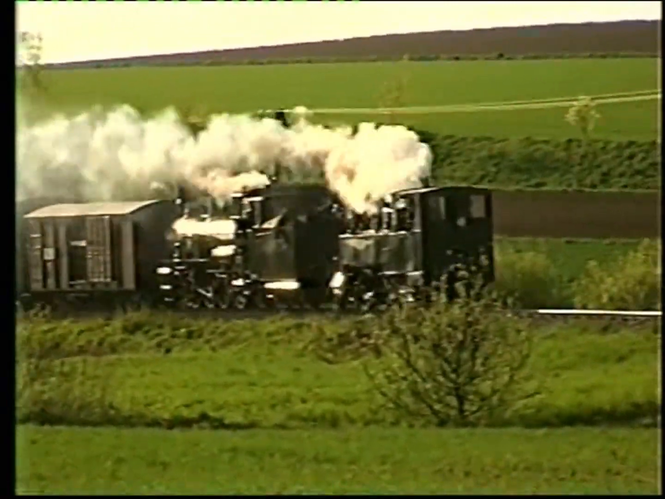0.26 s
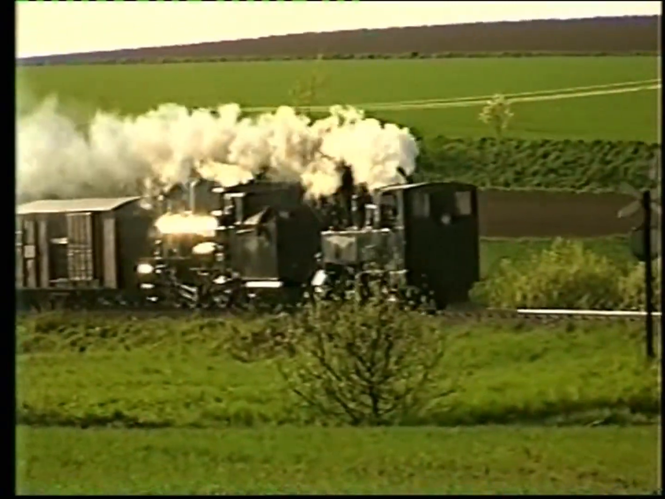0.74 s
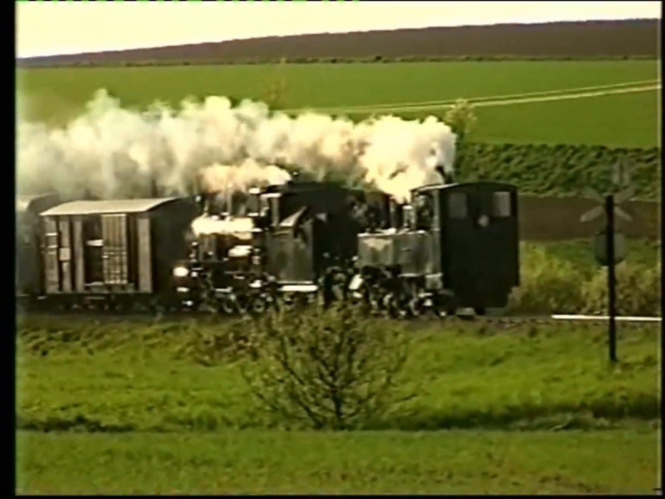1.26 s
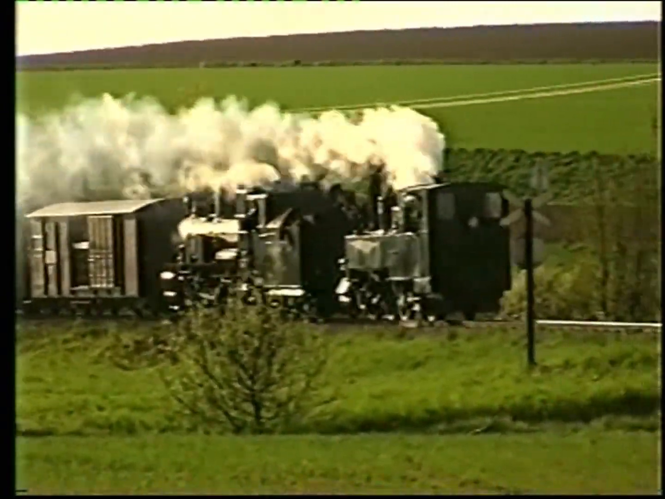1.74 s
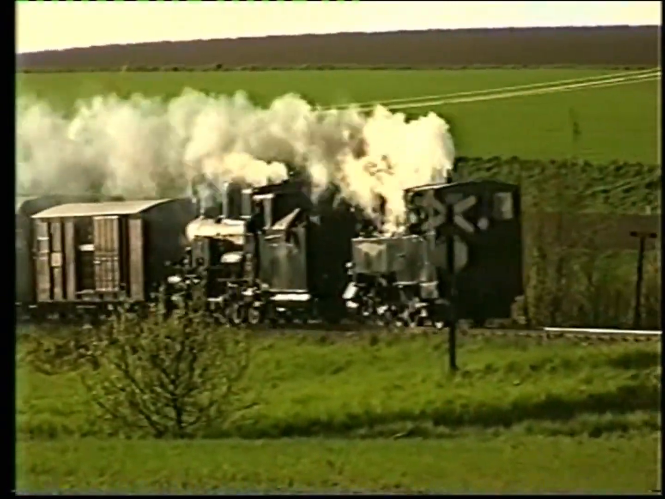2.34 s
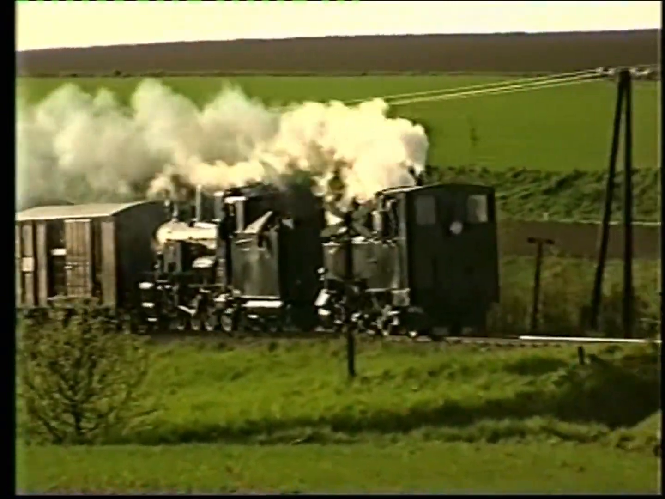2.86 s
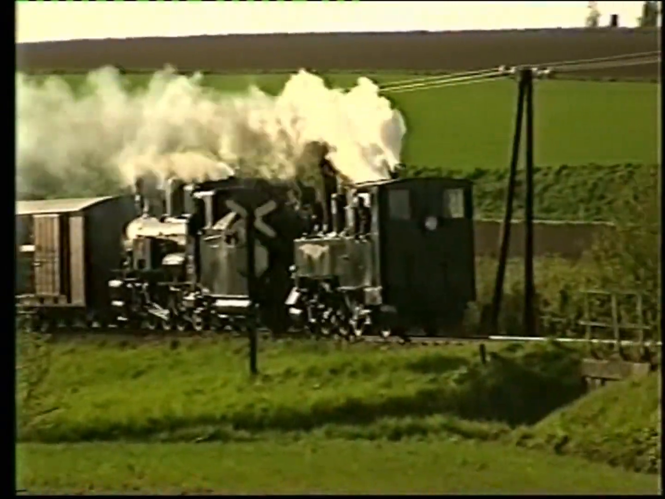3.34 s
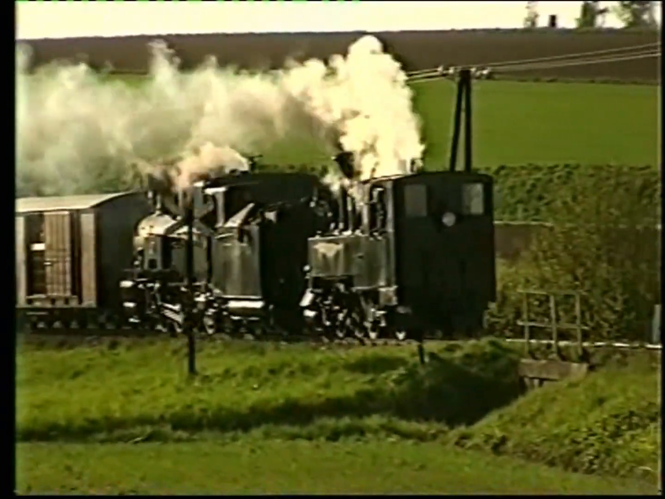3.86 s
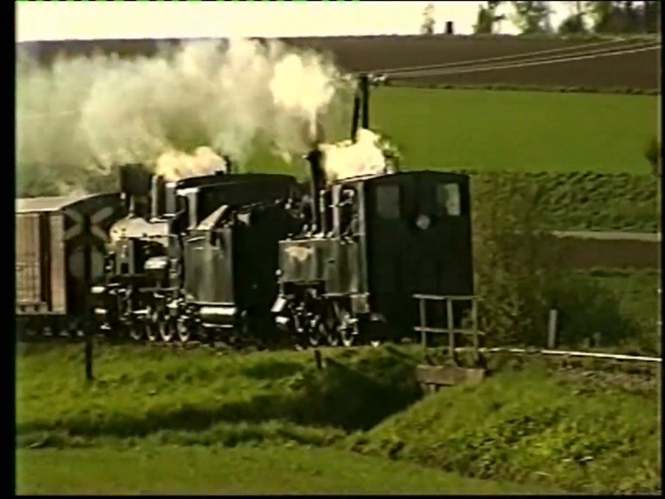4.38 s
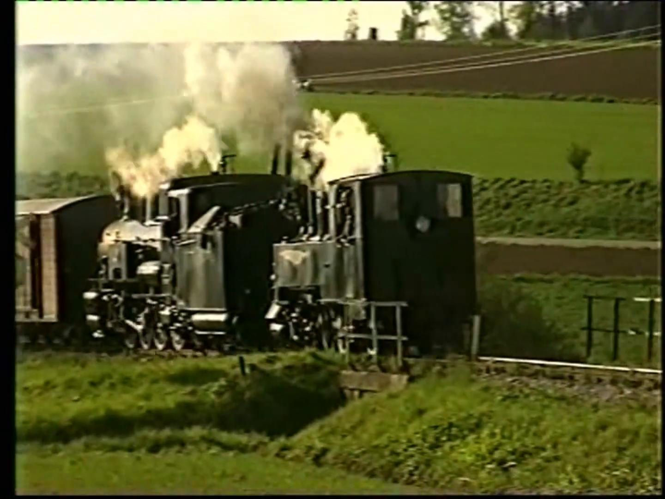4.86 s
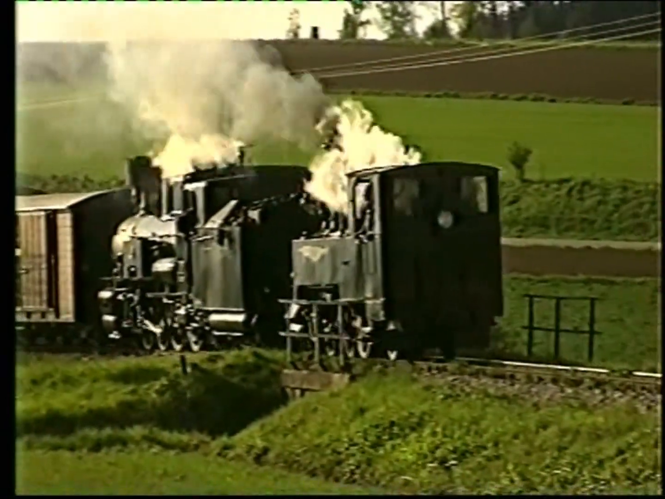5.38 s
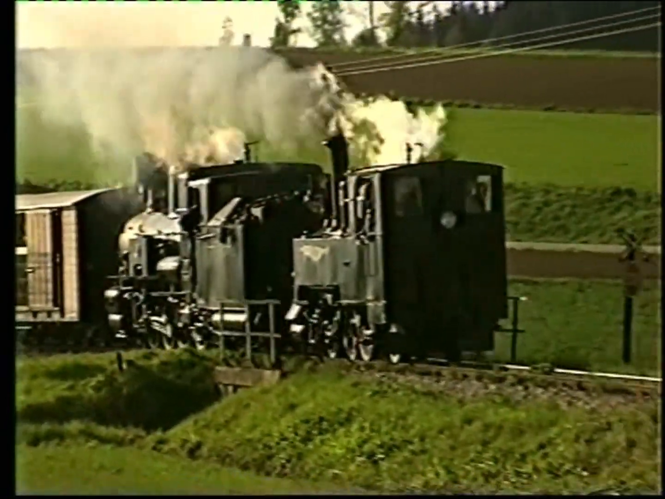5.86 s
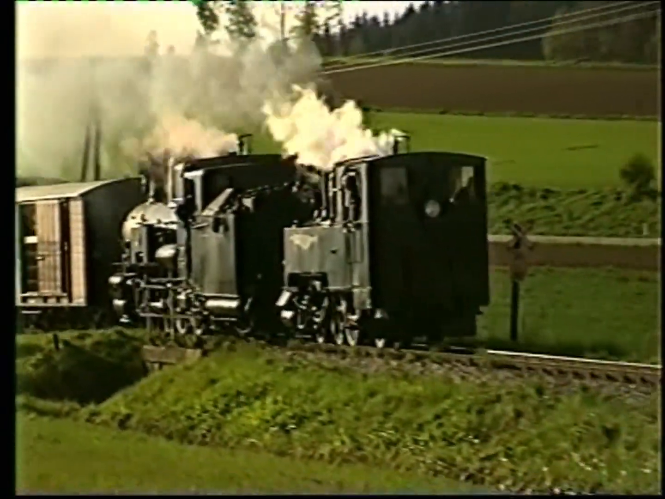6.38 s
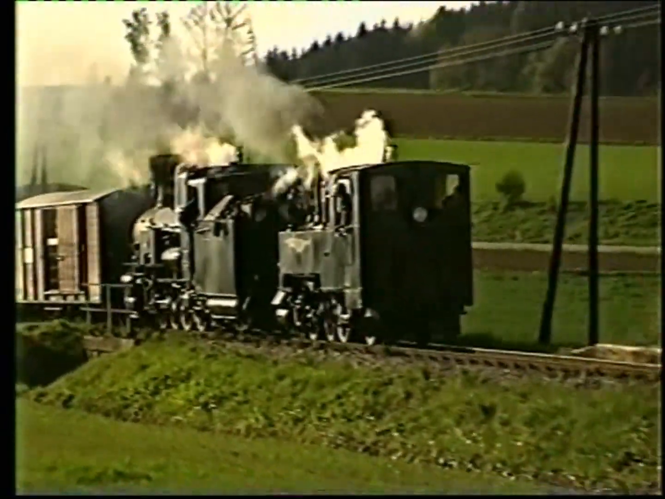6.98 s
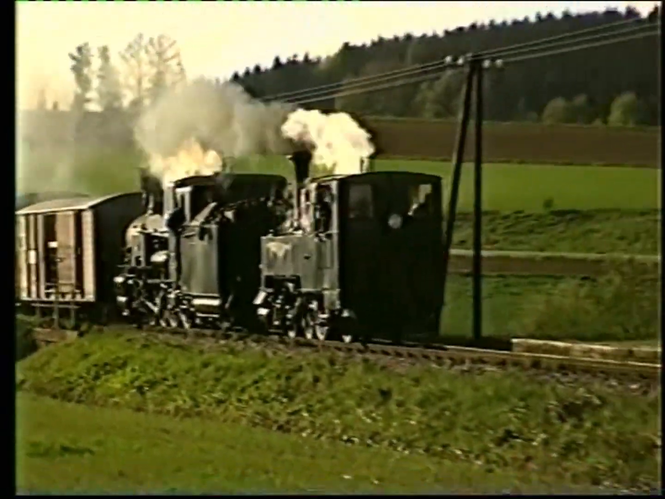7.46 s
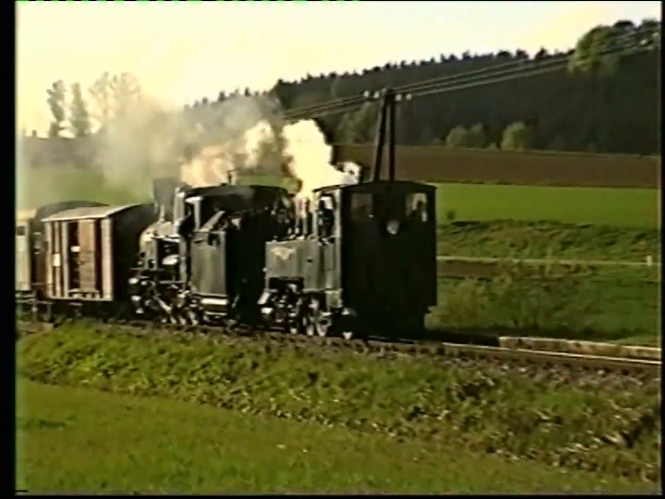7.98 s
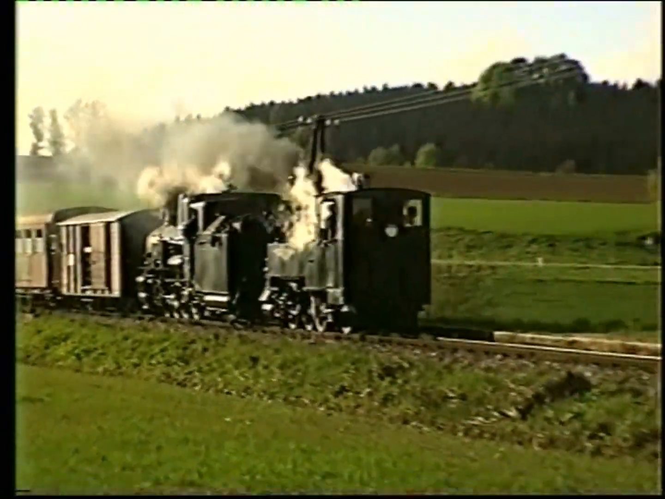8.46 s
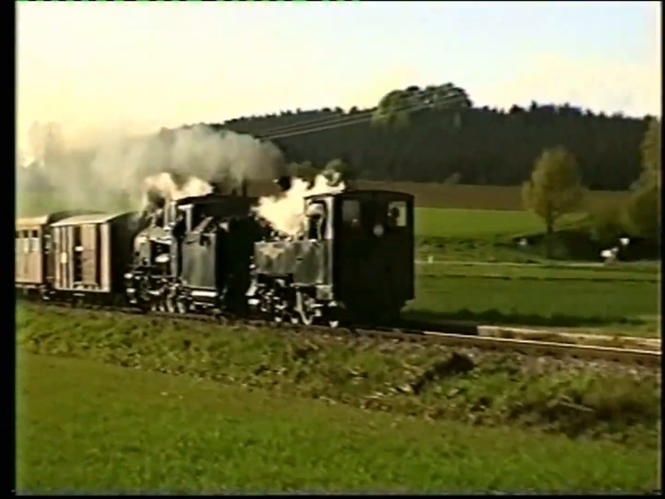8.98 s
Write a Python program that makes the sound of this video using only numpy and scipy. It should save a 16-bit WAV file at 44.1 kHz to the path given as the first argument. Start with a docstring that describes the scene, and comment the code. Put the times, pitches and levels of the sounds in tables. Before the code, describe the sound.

From 0 s a steam whistle is already blowing across open fields: a strong, nearly pure tone near 850 Hz, with shimmering overtones and breathy steam hiss. It rises slightly around 1 s, drops a little just before 2 s, spits a few tiny watery ticks around 2.6 to 2.8 s, then climbs back by 3 s, faintly beating. It cuts off at about 4.05 s; a short toot of roughly 0.14 s follows at 4.2 s, and soft, slightly lower echoes trail away. From 4.5 s the train emerges and swells to the end near 9 s: rapid, uneven exhaust chuffs, around fourteen a second from two engines, bright steam spurts, irregular metal clanks, hollow low thumps, leaking steam and rumbling, ringing wheels. The sound is mid-heavy and dulled by distance, almost entirely on the right, with faint hiss, low hum and a very high thin whine.

```python
"""Open fields ringed by hills: two small steam locomotives haul a train; a long whistle, then a short blast.
The whistle is a nearly pure pipe tone with fluttering overtones and jet hiss; echoes of the tone trail off.
Exhaust beats, rod clanks and rolling wheels swell up after it: noise bursts through resonances, shaped noise
and low thumps. The scene plays on the right; the left carries only leakage, hiss and hum."""
import sys
import numpy as np
from scipy import signal
from scipy.fft import rfft, irfft, next_fast_len
from scipy.io import wavfile
from scipy.ndimage import uniform_filter1d

SR = 44100
rng = np.random.default_rng(int(sys.argv[2]) if len(sys.argv) > 2 else 0)


def pcm_store(signal):
    """Save signal as 16-bit PCM."""
    levels = np.round(np.clip(np.atleast_2d(signal), -1, 1) * 32767)
    wavfile.write(sys.argv[1], SR, levels.astype(np.int16).T)


N = 407043   # length in samples

# Levels are balances inside the scene, ahead of the trims in the functions and the final doubling.
# In noise colours, shape_db is only relative: the noise is scaled to rms 1.

# Whistle valve: open_s, shut_s (where the fall begins)
VALVE_TIMES = [(-1.0, 4.057), (4.226, 4.363)]
# Driver's hand on the whistle: time_s, pitch_hz (at full pressure), tone_db, overtones_db, hiss_db
WHISTLE_HAND = [(0.0, 854, -23.5, -45, -53), (0.28, 851, -23, -46.5, -59), (0.36, 849, -25, -48.5, -55.5),
                (0.46, 848, -22, -50, -57.5), (0.6, 849, -23.3, -50, -56), (0.67, 857, -25, -50, -55.5),
                (0.73, 868.4, -23.5, -47.5, -56), (0.88, 878, -24, -45.5, -59.5),
                (1.15, 878, -23.5, -45, -59.5), (1.27, 869, -25.5, -45.5, -61),
                (1.36, 872, -25, -42, -54.5), (1.49, 871, -23.5, -42.5, -48),
                (1.62, 879.4, -24.5, -40, -54), (1.76, 880.4, -24, -43, -60), (1.86, 873, -24, -42, -59.5),
                (1.95, 829.7, -26.5, -49, -62.5), (2.23, 833.6, -24.5, -46, -56.5),
                (2.45, 822.5, -23.5, -53, -57), (2.55, 820, -23.5, -55.5, -66), (2.62, 824, -26, -58, -63),
                (2.81, 829, -22.5, -50, -59), (2.93, 849, -23, -46.5, -53.5), (3.08, 850, -23, -44, -51.5),
                (3.22, 853, -25, -45, -58), (3.43, 862, -25, -39, -51.5), (3.6, 844, -24, -45, -52),
                (3.83, 842.6, -23.5, -45, -55), (3.93, 842, -24.5, -43, -55), (4.01, 852, -22, -46, -51),
                (4.06, 838, -23, -48, -61), (4.25, 837.4, -24, -43, -51), (4.29, 845, -22, -48, -50.5),
                (4.35, 858, -23.5, -41, -53), (4.37, 843, -24, -42, -56)]
# Whistle overtones: multiple of the pitch, level_db, share of the overtones' swing followed, flutter_db
OVERTONES = [(2, -6, .2, 3.5), (3, -8.5, 0.73, 2.5), (4, -0.7, 1, 1.24), (5, -14.5, 0.82, 2),
             (6, -13, 1.05, 2.3), (8, -31.5, .95, 2.5)]
# Tone colour: time_s, then lift_db of the 2nd, 3rd, 5th, 6th and 8th partial
TONE_COLOUR = [(0, 4.5, -6, 7.5, -4, -1), (.26, -7.5, -1, 4, 1.5, 5), (.4, 4, -4.5, 5.5, 2.5, -2),
               (.7, -2.5, 0.5, 4.5, -4.5, 2), (1.0, 3, -1, 6, -10, 0.5), (1.2, 2, 3, 6, -7.5, 3.5),
               (1.45, -1, 0.5, 5, -1, 12), (1.65, -2, 3.5, 0, -7, 1), (1.88, -3.5, -1.5, -10, 2, 3.5),
               (2.15, -1, -3.5, -4, 2.5, -0.5), (2.4, 1.5, -5, -6, 3, 0), (2.7, -3, 4, -7, 4.5, 1),
               (3.0, -1.5, -0.5, -4.5, 3.5, 3), (3.4, -3, -5.5, 2.5, 0, 2.5), (3.7, -0.5, -0.5, -2, 1.5, 0),
               (4.3, 2, -4, -2, 1, 0)]
# Fainter tone sliding away under the whistle and beating with it:
# time_s, below_hz, level_db (against the tone), octave_db (on the overtones' scale)
SLIDING_TONE = [(3.09, 5.9, -29, -76), (3.21, 8.3, -13, -66), (3.41, 18, -13.5, -65), (3.53, 22, -20, -59),
                (3.6, 31, -16.5, -52), (3.68, 32, -15, -49.5), (3.76, 33, -20, -59), (3.95, 39, -27, -58),
                (4.06, 40, -26, -55)]
# Colour of the whistle's steam jet: freq_hz, shape_db (per Hz)
JET_COLOUR = [(600, -21), (1000, 8), (1700, -1.5), (2300, -10), (3500, -1.5), (4300, -3), (5100, -5),
              (6000, -8), (7200, -11.5), (10000, -21.5), (14000, -45)]
# Lift of the jet's highest treble: time_s, lift_db
JET_TREBLE = [(0, -1), (.2, -1.5), (.55, 5.5), (.8, -1), (1.2, -1), (1.5, 1), (1.8, 0), (2.2, 1),
              (2.5, -1.5), (3.0, 2), (3.5, -0.5), (4.3, 1.5)]
# Sound bounced off the field, cutting notches in the hiss: time_s, lag_ms, share of the direct sound
FIELD_BOUNCE = [(0, .445, .25), (.6, .44, 0.33), (1.3, .445, 0.33), (1.66, .46, .25), (2.0, .535, .55),
                (2.5, .535, .55), (3.0, .535, .55), (3.6, .53, .4), (4.4, .53, 0.37)]
# Clearest single echoes: first_lag_s, level_db, pitch drop as a share
CLEAR_ECHOES = [(.13, -25.5, .004), (.213, -25, 0.019), (0.435, -21, .032), (.56, -27.5, .03),
                (.686, -28, 0.033)]
# The train as a whole: time_s, rolling_db, leak_db (against rolling)
TRAIN_LEVELS = [(0.0, -54.5, 3.5), (0.46, -54.5, 2), (1.67, -58.5, 0), (2.6, -50, 1), (3.24, -56, 0.5),
                (4.6, -51.5, -1), (4.95, -46.5, -2.5), (5.4, -43.5, -6), (5.85, -42.5, -4.5),
                (6.4, -42, -2), (7.1, -40.5, -4.5), (7.45, -40.5, -0.5), (7.9, -39, -5),
                (8.12, -38.5, -4.5), (8.26, -39, -6), (8.4, -38.5, -3.5), (9.05, -37, -3.5),
                (9.23, -36, -8)]
# Colour of the rolling rumble: freq_hz, shape_db (per Hz)
ROLLING_COLOUR = [(24, -61), (40, -23.5), (130, -0.5), (173, -2), (227, -8.5), (269, -11.5), (310, -9),
                  (380, -12), (460, -4.5), (571, -0.5), (793, -7.5), (961, -1), (1230, -16), (1440, -7),
                  (1920, -11.5), (4000, -26), (5200, -37.5), (8800, -120)]
# Ringing wheels and frames: freq_hz, width_hz, level_db (against rolling), throb_db
WHEEL_RINGS = [(129, 39, -16, 0.5), (271, 22, -13.5, 3), (568.5, 24, -11, 3.5), (999, 130, -6.5, 2.5)]
# Colour of the steam leak: freq_hz, shape_db (per Hz)
LEAK_COLOUR = [(700, -30.5), (1200, -21), (1460, 1), (2300, 0.5), (3000, -1.7), (3700, -5), (4200, -9.5),
               (5900, -14), (8500, -28.5), (12000, -42.5), (16000, -74.5)]
# Clearest cylinder spurts: top_s, peak_db
CLEAR_SPURTS = [(4.547, -63), (4.679, -60), (4.829, -63), (4.96, -63), (5.107, -62), (5.23, -58),
                (5.39, -54), (5.51, -61), (5.677, -59), (5.81, -58), (5.96, -54), (6.09, -52), (6.229, -55),
                (6.364, -49), (6.519, -53), (6.655, -55), (6.794, -54), (6.936, -54), (7.083, -48),
                (7.21, -48), (7.36, -54), (7.495, -53), (7.659, -52), (7.781, -53), (7.931, -50),
                (8.06, -50), (8.21, -46), (8.345, -45), (8.474, -45.5), (8.617, -49), (8.765, -50),
                (8.909, -49), (9.054, -48), (9.185, -49)]
# Colour of a spurt: freq_hz, shape_db (per Hz)
SPURT_COLOUR = [(2000, -14), (3500, -3), (5000, 0), (6500, -2), (8000, -8.5), (10000, -14), (12000, -23),
                (14000, -40)]
# Heaviest exhaust beats: start_s, peak_db, length_s
HEAVY_CHUFFS = [(4.547, -46, 0.03), (4.821, -40, 0.041), (5.024, -36, 0.03), (5.308, -29.5, 0.027),
                (5.512, -33, 0.028), (5.585, -29, 0.033), (6.075, -30.5, 0.11), (6.177, -32, 0.024),
                (6.43, -34, 0.05), (6.586, -33, 0.028), (6.715, -29.5, 0.036), (6.917, -29.5, 0.056),
                (7.287, -25.5, 0.02), (7.42, -28, 0.017), (7.84, -27, 0.028), (7.99, -25, 0.034),
                (8.071, -26, 0.03), (8.126, -24, 0.025), (8.41, -28.5, 0.057), (8.879, -23.5, 0.012),
                (9.137, -31, 0.034)]
# Chimney resonances: freq_hz, width_hz, level_db
CHIMNEY_MODES = [(136.6, 52, -4), (266, 14, -3.5), (554, 48, 1.5), (700, 72, -0.5), (1010, 240, -5)]
# Hardest knocks: start_s, peak_db, length_s
HARD_CLANKS = [(4.67, -49, .02), (4.79, -44, .02), (5.216, -47, .02), (5.381, -43, 0.015),
               (5.459, -41.5, 0.019), (5.668, -46, .015), (5.75, -44, .015), (6.03, -42, .015),
               (6.309, -38, 0.016), (6.583, -43, 0.014), (7.008, -39.5, .018), (7.44, -44, 0.013),
               (7.855, -39, .018), (7.994, -38, .016), (8.15, -37, 0.021), (8.605, -38, 0.014),
               (8.713, -34, 0.019), (9.171, -36, 0.017), (5.592, -41, 0.016), (5.898, -38, 0.022),
               (5.963, -35, 0.033), (6.16, -38, 0.015), (6.39, -34.5, 0.011), (6.473, -38.5, 0.025),
               (6.647, -35, 0.0085), (6.908, -38, .016), (6.76, -37, 0.013), (7.127, -35, 0.019),
               (7.17, -37, 0.011), (7.288, -39, 0.014), (7.543, -35, 0.013), (7.68, -33.5, 0.022),
               (8.342, -36, 0.013), (8.455, -30, 0.021), (8.662, -30, 0.0094), (8.769, -33.5, 0.023),
               (8.875, -30.5, 0.025), (8.977, -34, 0.013), (9.047, -33, 0.013), (9.112, -32, 0.015)]
# Colour of a blow: freq_hz, shape_db (per Hz)
CRACK_COLOUR = [(200, -25), (500, -1), (1000, 1.5), (2000, 5), (3600, -4.5), (6000, -15.5), (10000, -30),
                (14000, -55.5)]
# Ringing rods: freq_hz, level_db, ring_s (the resonance is 3.1 / ring_s Hz wide)
ROD_MODES = [(1480, -7, 0.043), (1970, -4, 0.038), (2620, -2, 0.074), (3500, -1.5, 0.023),
             (4290, -15.5, .05), (5080, -2, 0.025), (5800, 2.5, 0.029), (7750, -16.5, 0.021)]
# Water spits in the whistle: start_s, peak_db
WATER_SPITS = [(2.604, -38.5), (2.6152, -41.5), (2.6354, -46), (2.6773, -41), (2.8218, -41)]
# Hollow low thumps, many of them on the engines' beat: top_s, peak_db, pitch_hz
LOW_THUMPS = [(2.6, -58, 277), (2.752, -57, 275), (4.76, -50, 277.5), (5.045, -45.5, 276),
              (5.197, -44, 270.4), (5.6, -50, 280), (5.762, -48, 260), (5.896, -46.5, 274),
              (6.122, -47, 269), (6.193, -48, 275), (6.307, -44, 263), (6.482, -41, 271),
              (6.61, -40.5, 270), (6.9, -45, 268), (7.014, -41, 271), (7.16, -44, 266), (7.235, -44.5, 267),
              (7.443, -44.5, 258), (8.075, -46, 265), (8.135, -45, 258), (8.473, -38.5, 264),
              (8.586, -41.5, 270), (9.135, -40, 315)]
# High steady whine and its side tones: offset in multiples of the hum pitch, level_db
WHINE_TONES = [(-2, -83), (-1, -80), (0, -54), (1, -75.5), (2, -82.5)]

# the tone starts just under full strength and dies ever faster
FIRST_DB, OPEN_DB_PER_S, SHUT_DB_PER_S2 = -3, 280, 27000
SAG_HZ_PER_DB, SAG_MOST_HZ = 5, 95   # pitch falls with the steam pressure at the valve
OVERTONES_DB = -45   # the middle of the overtones' swing
FLUTTER_HZ, SMEAR = 9, .4   # flutter rate, share of noisy smear
JET_TAIL_S = 0.021   # the jet hisses on a little after the tone
JET_SPLIT_HZ, TREBLE_HZ = 4600, 7500
RUSH_DB, RUSH_FOLLOWS, HISS_DB = -50.5, 0.27, -55   # the low rush follows the hiss around HISS_DB
# scattered echoes: lowest starting level, fade time, farthest first lag, largest pitch drop as a share
ECHO_DB, ECHO_T60_S, ECHO_SPAN_S, ECHO_DROP = -35.5, 5.4, 1.0, 0.025
BEAT_PER_S, BEAT_AT_S = 7.09, 8.48   # pulse of the cylinders, reference time of one beat
SPURT_S, SPURT_DB = .03, -15   # length, dB against rolling for the less clear ones
# the two engines beat in turn: dB against rolling for each, spread, typical length, timing spread
CHUFF_DB, CHUFF_SPREAD_DB, CHUFF_S, CHUFF_JITTER_S = (6.5, 5.5), 2.5, 0.028, .005
CHUFF_TOP_HZ = 5000   # the blast carries little above this
# random clatter: typical gap, dB against rolling, spread, typical length
CLANK_GAP_S, CLANK_DB, CLANK_SPREAD_DB, CLANK_S = .07, -4, 3, 0.014
GRIT_DB = 1.5   # blows are made of uneven grains
THUMP_S = 0.023   # half width
LOW_HZ, AIR_HZ = 62, 9750   # band of the train that carries through the air
HUM_HZ, HUM_DB, WHINE_HZ, CUTOFF_HZ = 50, -67, 15625.3, 15970


def amp(db):
    """Decibels to gain."""
    return 10 ** (np.asarray(db) / 20)


def rms_one(x):
    """Scale to unit rms."""
    return x / np.sqrt(np.mean(x ** 2) + 1e-20)


def in_time(rows, silent=None):
    """Columns of a curve at every sample; outside its span the end values, or the value silent."""
    s, *columns = np.transpose(rows)
    return [np.interp(np.arange(N) / SR, s, column, silent, silent) for column in columns]


def drift(rate_hz):
    """Slow random wander of spread 1: noise through two equal low-pass poles, run every 40 samples."""
    r = np.exp(-80 * np.pi * rate_hz / SR)
    noise = rng.standard_normal(N // 40 + 2002)
    slow = signal.lfilter([1], [1, -2 * r, r * r], noise)[2000:]   # drop the settling
    return np.interp(np.arange(N) / 40, np.arange(len(slow)), rms_one(slow))


def coloured(spectrum):
    """Noise with the given spectrum, rms 1."""
    size = next_fast_len(N)
    hz = np.maximum(np.arange(size // 2 + 1) * SR / size, 1)
    freq_hz, shape_db = np.transpose(spectrum)
    gain = amp(np.interp(np.log(hz), np.log(freq_hz), shape_db))
    return rms_one(irfft(rfft(rng.standard_normal(size)) * gain, size)[:N])


def resonance(x, hz, width_hz):
    """Two-pole band-pass with gain near 1 at its top."""
    r = np.exp(-np.pi * width_hz / SR)
    poles = [1, -2 * r * np.cos(2 * np.pi * hz / SR), r * r]
    return signal.lfilter(np.array([1, 0, -1]) * (1 - r * r) / 2, poles, x)


def filtered(x, order, hz, kind):
    """Butterworth filter."""
    return signal.sosfilt(signal.butter(order, hz, kind, fs=SR, output="sos"), x)


def puffs(rows):
    """Envelope of bursts that swell and die smoothly, topping half a length after the start."""
    out = np.zeros(N)
    for start_s, peak_db, length_s in rows:
        u = np.arange(int(8 * length_s * SR)) / (max(length_s, .002) * SR)
        i = int(start_s * SR)
        out[i:i + len(u)] += (amp(peak_db) * 2 * u * np.exp(1 - 2 * u))[:N - i]
    return out


def valve():
    """Steam pressure at the whistle in dB: a quick rise, a hold, a steep fall."""
    t = np.arange(N) / SR
    pressure_db = np.full(N, -120.0)
    for open_s, shut_s in VALVE_TIMES:
        rise = np.minimum(FIRST_DB + OPEN_DB_PER_S * (t - open_s), 0)
        fall = -SHUT_DB_PER_S2 * np.maximum(t - shut_s, 0) ** 2
        blast = np.where(t < open_s, -120, np.minimum(rise, fall))
        pressure_db = np.maximum(pressure_db, blast)
    return pressure_db


def valve_opening(pressure_db):
    """Steam pressure as a smoothed gain."""
    return uniform_filter1d(amp(pressure_db), size=260)


def whistle_tone(pressure_db):
    """A nearly pure pipe tone, its pitch sagging with pressure, its partials shaken by turbulence."""
    pitch, tone_db, overtones_db, _ = in_time(WHISTLE_HAND)
    lift_db = dict(zip((2, 3, 5, 6, 8), in_time(TONE_COLOUR)))
    sag = np.minimum(-SAG_HZ_PER_DB * pressure_db, SAG_MOST_HZ)
    phase = 2 * np.pi * np.cumsum(pitch - sag + 2.7 * drift(31)) / SR

    below_hz = in_time(SLIDING_TONE, 0)[0]
    _, under_db, octave_db = in_time(SLIDING_TONE, -120)
    under_phase = phase - 2 * np.pi * np.cumsum(below_hz) / SR
    under = amp(under_db + 1.5 * drift(8)) * np.sin(under_phase)
    tone = amp(tone_db + .5 * drift(57)) * (np.sin(phase) + under)

    overtones = amp(octave_db + 1.5 * drift(20)) * np.sin(2 * under_phase)
    # turbulence shakes the height of every partial and smears noise around it
    for multiple, db, follows, flutter_db in OVERTONES:
        k = int(multiple)
        partial_db = OVERTONES_DB + db + follows * (overtones_db - OVERTONES_DB) + lift_db.get(k, 0)
        shaking = amp(flutter_db * drift(FLUTTER_HZ)) + SMEAR * drift(250)
        overtones += amp(partial_db) * shaking * np.sin(k * phase)
    return np.sqrt(2) * valve_opening(pressure_db) * (tone + overtones)


def off_the_field(x):
    """The sound plus its late bounce off the ground, which combs the spectrum."""
    lag_ms, share = in_time(FIELD_BOUNCE)
    late = np.arange(N) - lag_ms * SR / 1000
    dulled = uniform_filter1d(x, size=2)   # grass dulls it
    return x + share * np.interp(late, np.arange(N), dulled)


def whistle_jet(pressure_db):
    """Turbulent noise of the steam jet that drives the pipe: a low rush and a high hiss."""
    hiss_db = in_time(WHISTLE_HAND)[3]
    opening = valve_opening(pressure_db)
    r = np.exp(-1 / (JET_TAIL_S * SR))
    flow = np.maximum(opening, signal.lfilter([1 - r], [1, -r], opening))
    flow = flow * amp(1.3 * drift(9))
    jet = coloured(JET_COLOUR)
    rush = filtered(jet, 3, JET_SPLIT_HZ, "low")
    hiss = filtered(jet, 3, JET_SPLIT_HZ, "high")
    hiss = hiss + (amp(in_time(JET_TREBLE)[0]) - 1) * filtered(hiss, 3, TREBLE_HZ, "high")
    rush_db = RUSH_DB + RUSH_FOLLOWS * (hiss_db - HISS_DB) + 1.4 * drift(6)
    return flow * (amp(rush_db) * rms_one(rush) + amp(hiss_db) * rms_one(off_the_field(hiss)))


def hills(x):
    """Scattered echoes; their paths lengthen as the train runs on, which lowers their pitch."""
    t, out = np.arange(int(6 * SR)) / SR, np.zeros(N)
    clear_lag_s, clear_db, clear_drop = np.transpose(CLEAR_ECHOES)
    place, turn, size = rng.random((60, 3)).T
    place = (np.arange(len(place)) + place) / len(place)   # spread all the way out
    lag_s = place * ECHO_SPAN_S
    echo_db = ECHO_DB - 60 * lag_s / ECHO_T60_S + 6 * size
    lags = np.append(lag_s, clear_lag_s)
    gains = amp(np.append(echo_db, clear_db))
    drops = np.append(ECHO_DROP * turn, clear_drop)
    for lag, gain, drop in zip(lags, gains, drops):
        out[:len(t)] += gain * np.interp(t - lag - drop * t, t, x[:len(t)], 0)
    return amp(1.6 * drift(18)) * resonance(out, 1400, 1900)   # moving air makes them flicker


def beat(early_s):
    """The steady pulse of the cylinders as a cosine, uneven in strength."""
    turn = 2 * np.pi * BEAT_PER_S * (np.arange(N) / SR - BEAT_AT_S + early_s)
    return np.cos(turn) * np.clip(1 + 0.57 * drift(7.6), 0, 2)


def rolling_wheels(rolling_db):
    """Wheels rumble on the rails as shaped noise; wheels and frames ring and throb with the beat."""
    rumble = amp(1.1 * drift(9.9)) * coloured(ROLLING_COLOUR)
    rails = rng.standard_normal(N)
    ringing = np.zeros(N)
    for hz, width_hz, db, throb_db in WHEEL_RINGS:
        swing_db = 1.3 * drift(3.7) + throb_db * beat(0.037)
        ringing += amp(db + swing_db) * rms_one(resonance(rails, hz, width_hz))
    return amp(rolling_db) * (rumble + ringing)


def steam_leak(rolling_db, leak_db):
    """Steam leaks from glands and valves: unsteady noise that pulses faintly with the beat."""
    swing_db = 1.1 * drift(11.0) + 1.0 * drift(35) + .6 * beat(0)
    return amp(rolling_db + leak_db + swing_db) * coloured(LEAK_COLOUR)


def with_train(s, db, length_s, loud):
    """The loud rows, and between them bursts whose height rides on the level of the rolling train."""
    gap_s = np.abs(s[:, None] - np.transpose(loud)[0]).min(axis=1)
    free = (s >= 0) & (s < N / SR) & (gap_s > .03)
    time_s, rolling_db, _ = np.transpose(TRAIN_LEVELS)
    peak_db = np.interp(s, time_s, rolling_db) + db
    return np.transpose([s, peak_db, length_s])[free].tolist() + list(loud)


def spurts():
    """Steam spurts from the cylinders: a short bright hiss on every pulse."""
    k = np.arange(-60, 6)
    top_s = BEAT_AT_S + k / BEAT_PER_S
    db = SPURT_DB + 2.5 * rng.standard_normal(len(k))
    clear = [(s, peak_db, SPURT_S) for s, peak_db in CLEAR_SPURTS]
    rows = with_train(top_s, db, np.full(len(k), SPURT_S), clear)
    rows = [(max(s - length / 2, 0), peak_db, length) for s, peak_db, length in rows]   # top to start
    return puffs(rows) * coloured(SPURT_COLOUR)


def exhaust():
    """Beats blow noise through the chimney resonances; the engines alternate, twice per cylinder pulse."""
    k = np.arange(-130, 14)
    late, strong, long = rng.standard_normal((len(k), 3)).T
    start_s = BEAT_AT_S + k / (2 * BEAT_PER_S) + CHUFF_JITTER_S * late
    db = np.array(CHUFF_DB)[k % 2] + CHUFF_SPREAD_DB * strong
    beats = with_train(start_s, db, CHUFF_S * amp(2.5 * long), HEAVY_CHUFFS)
    blast = signal.lfilter(*signal.butter(2, CHUFF_TOP_HZ, fs=SR), puffs(beats) * rng.standard_normal(N))
    out = np.zeros(N)
    for mode, (hz, width_hz, mode_db) in enumerate(CHIMNEY_MODES):
        out += (-1) ** mode * amp(mode_db) * resonance(blast, hz, width_hz)   # signs alternate
    return amp(8.0) * out


def clanks():
    """A dull crack of noise also rings the rods, each mode's strength changing from blow to blow."""
    gap, strong, long = rng.standard_normal((300, 3)).T
    start_s = np.cumsum(CLANK_GAP_S * amp(4 * gap))
    db = CLANK_DB + CLANK_SPREAD_DB * strong
    clatter = with_train(start_s, db, CLANK_S * amp(2.5 * long), HARD_CLANKS)
    crack = puffs(clatter) * rms_one(amp(GRIT_DB * drift(220))) * coloured(CRACK_COLOUR)
    rings = np.zeros(N)
    for hz, mode_db, ring_s in ROD_MODES:
        rings += amp(mode_db + 2.2 * drift(5.2)) * resonance(crack, hz, 3.1 / ring_s)
    return amp(-3) * crack + amp(-8.0) * rings


def spits():
    """Water spits in the whistle: short bright ticks of noise."""
    # freq_hz, shape_db (per Hz)
    colour = [(1200, -21), (2200, -4), (4500, 5), (7000, -6), (11000, -16.5), (13000, -44)]
    return amp(-5.0) * puffs([(s, db, .004) for s, db in WATER_SPITS]) * coloured(colour)


def thumps():
    """Hollow low thumps: each swells and fades as a bell curve on a single low pitch."""
    out, u = np.zeros(N + SR), np.arange(-3, 3, 1 / (THUMP_S * SR))   # u counts half widths
    for (top_s, peak_db, hz), turn in zip(LOW_THUMPS, rng.random(len(LOW_THUMPS))):
        i = int((top_s - 3 * THUMP_S) * SR)
        tone = np.sin(2 * np.pi * (hz * THUMP_S * u + turn))
        out[i:i + len(u)] += amp(peak_db) * np.exp(-u * u / 2) * tone
    return out[:N]


def train():
    """All the sounds of the running train; the air dulls them."""
    rolling_db, leak_db = in_time(TRAIN_LEVELS)
    near = rolling_wheels(rolling_db) + steam_leak(rolling_db, leak_db)
    near += spurts() + exhaust() + clanks() + thumps()
    return filtered(near, 3, [LOW_HZ, AIR_HZ], "band")


def scene():
    """Everything reaches one microphone."""
    pressure_db = valve()
    tone = whistle_tone(pressure_db)
    mono = tone + whistle_jet(pressure_db) + hills(tone) + train() + spits()
    return np.stack([mono, mono])


def record(dry):
    """The scene plays on the right and leaks, thinned, into the left through stray capacitance."""
    t = np.arange(N) / SR
    wavering = amp(1.3 * np.sin(2 * np.pi * .37 * t - 1.5))
    jitter = .12 * drift(70) + .3 * drift(4)   # the whine's phase trembles, in radians
    whine = np.zeros(N)
    for k, db in WHINE_TONES:
        whine += amp(db) * np.sin(2 * np.pi * (WHINE_HZ + k * HUM_HZ) * t + jitter)
    whine *= wavering
    track = 2 * (dry[1] + whine)
    hum = amp(HUM_DB) * np.sin(2 * np.pi * HUM_HZ * t)
    buzz = sum(amp(-106 - 1.2 * k) * np.sin(2 * np.pi * k * HUM_HZ * t + k * k) for k in range(1, 10))
    leakage = amp(-48.5) * resonance(track, 5000, 12000) + amp(-40.5) * 2 * whine
    hiss = filtered(rng.standard_normal((2, N)), 8, 14400, "low")
    both = np.stack([leakage + buzz, track + hum]) + amp([[-92], [-65]]) * hiss   # left, right
    return signal.sosfilt(signal.cheby2(24, 50, CUTOFF_HZ, fs=SR, output="sos"), both)


dry = scene()
out = record(dry)
pcm_store(out)
```